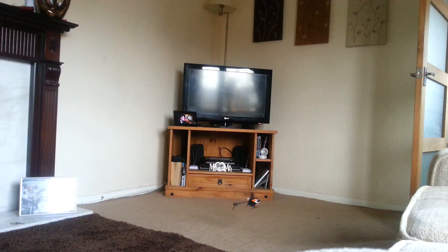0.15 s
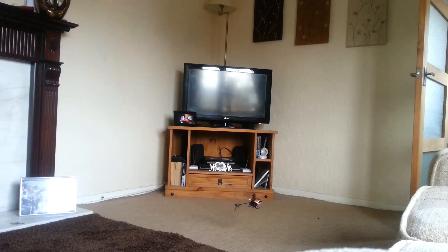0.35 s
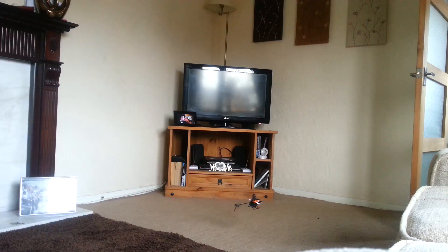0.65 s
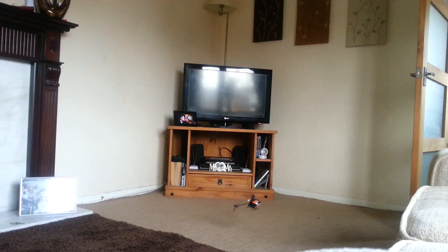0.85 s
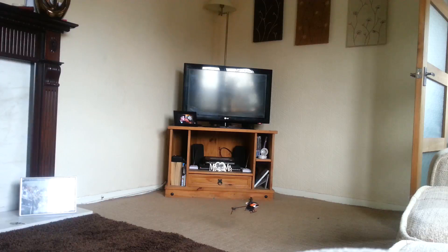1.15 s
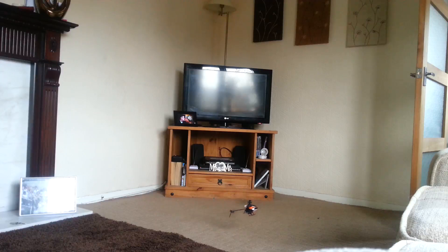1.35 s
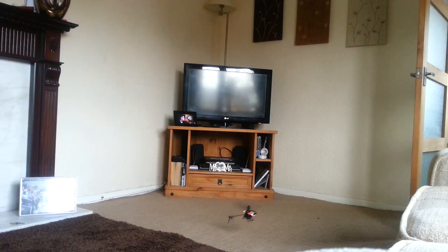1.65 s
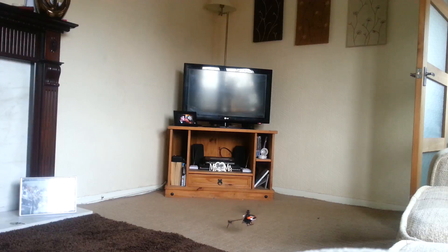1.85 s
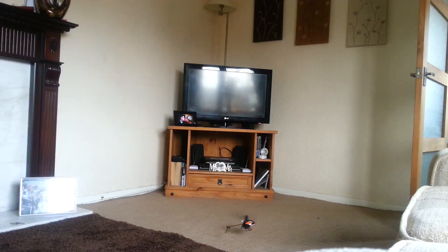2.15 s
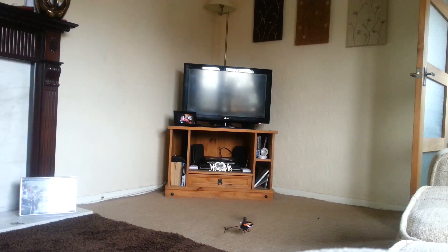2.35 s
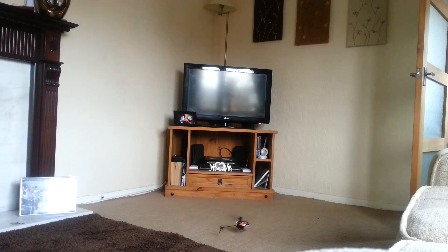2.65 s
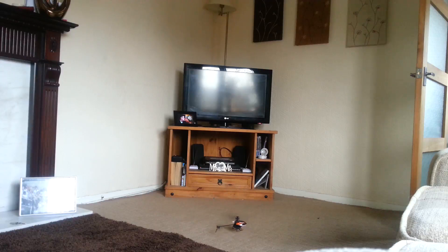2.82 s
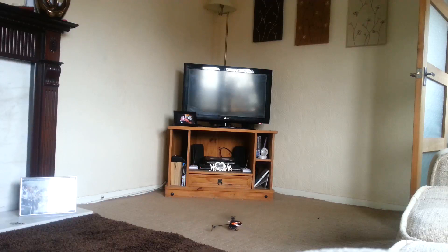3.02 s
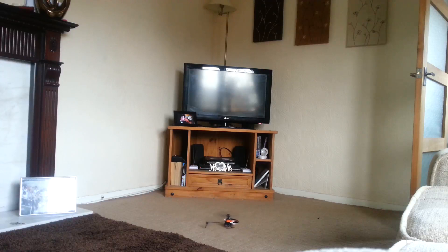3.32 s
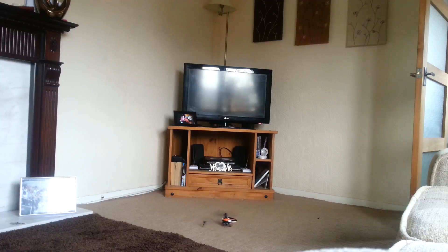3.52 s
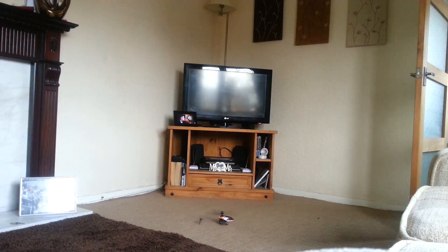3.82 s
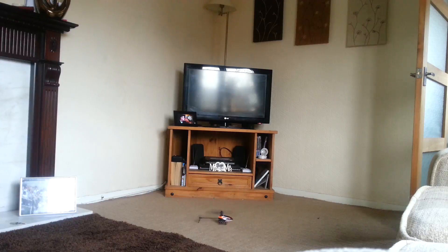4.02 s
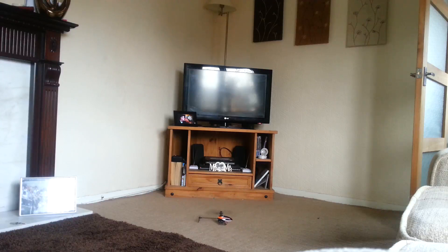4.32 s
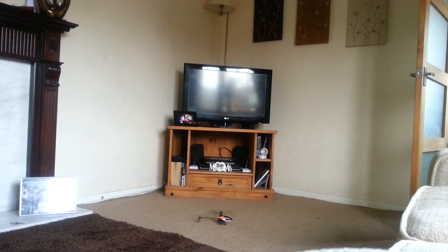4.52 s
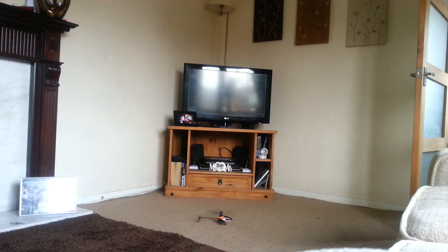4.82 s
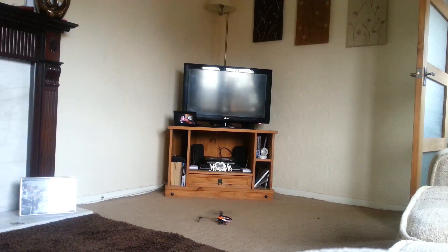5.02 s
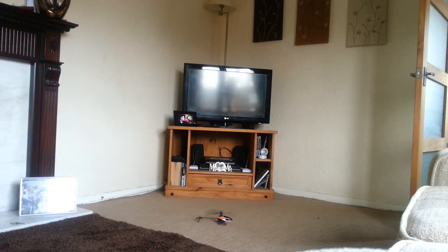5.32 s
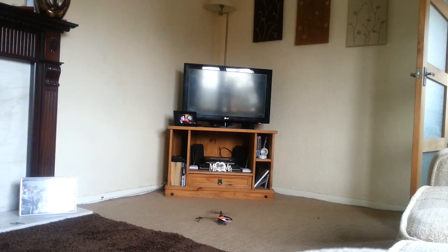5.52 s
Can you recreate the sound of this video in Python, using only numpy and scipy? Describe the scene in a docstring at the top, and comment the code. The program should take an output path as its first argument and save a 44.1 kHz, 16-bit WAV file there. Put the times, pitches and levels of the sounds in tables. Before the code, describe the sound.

In a carpeted living room, a toy electric helicopter hovers with a bright, buzzing motor whine, gear rattle and soft blade swish. The pitch sags slowly, then drops faster as it settles, with a wavering tail-propeller tone and soft skid bumps. At the end the motor cuts and loose gears knock and clatter as the rotor coasts. Fixed stereo microphone a little way off, faint hiss.

```python
"""A toy electric helicopter hovers low in a carpeted living room, over a faint hiss and low rumble.
A 7-tooth motor pinion drives the 54-tooth rotor gear: motor harmonics whine, tooth contacts rattle in the
plastic frame, two blades chop noise into a swish and a tail propeller adds a tone.
It sinks as the motor slows, its wake flutters on the carpet and the skids bump as decaying scuffs of noise.
The motor cuts, the whine dies and the slack gears clatter and knock as the rotor coasts."""
import sys
import numpy as np
from scipy import signal
from scipy.fft import rfft, irfft
from scipy.io import wavfile
from scipy.ndimage import uniform_filter1d

SR = 44100
rng = np.random.default_rng(int(sys.argv[2]) if len(sys.argv) > 2 else 0)


def master(y):
    """Save y as 16-bit WAV."""
    cut = np.clip(np.atleast_2d(y).T, -1, 1)
    pcm = np.round(cut * 32767)  # scale
    wavfile.write(sys.argv[1], SR, pcm.astype(np.int16))


N = 250047
TIME = np.arange(N) / SR
HZ = np.maximum(np.arange(N // 2 + 1) * SR / N, 1)

PINION_TEETH, GEAR_TEETH = 7, 54
ROTOR_PER_MOTOR = PINION_TEETH / GEAR_TEETH
MOTOR_CUT_S = 4.92
# main motor, hovering, throttled back, then coasting: (time [s], speed [turns/s])
SPEED = [(0.0, 276.7), (0.45, 276.4), (0.67, 273.4), (1.32, 272.7), (1.68, 269.7), (2.05, 269.35),
         (2.44, 267.5), (2.85, 259.9), (3.15, 256.3), (3.5, 250.4), (3.75, 240.4), (3.95, 227.3),
         (4.15, 209.4), (4.41, 179.8), (4.63, 165.6), (4.92, 157.9), (5.08, 118.0), (5.67, 48.0)]
# spectrum of air stirred by the blades: (frequency [Hz], relative density [dB])
WASH = [(30, -40), (90, -38), (160, -41), (215, -15.5), (280, -5), (335, -5), (420, 0.5), (620, 1.5),
        (770, -5), (950, -9), (1400, -10.5), (3000, -69)]


def from_db(db):
    """Decibels to amplitude gain."""
    return 10 ** (np.asarray(db) / 20)


def rms_one(x):
    """Scale to unit power."""
    return x / np.sqrt(np.mean(x ** 2) + 1e-20)


def in_time(rows):
    """Each column of a curve, interpolated at every sample."""
    s, *columns = np.transpose(rows)
    return [np.interp(TIME, s, c) for c in columns]


def over_hz(points):
    """A short spectrum interpolated over log frequency."""
    hz, value = np.transpose(points)
    return np.interp(np.log(HZ), np.log(hz), value)


def drift(rate_hz):
    """Smooth random wander of spread 1: noise through two poles at rate_hz."""
    step = 100  # samples
    pole = np.exp(-2 * step * np.pi * rate_hz / SR)
    noise = rng.standard_normal(N // step + 1002)
    slow = signal.lfilter([1], [1, -2 * pole, pole * pole], noise)[1000:]  # start-up dropped
    return np.interp(np.arange(N) / step, np.arange(len(slow)), rms_one(slow))


def swell(s, length_s):
    """A bell of height 1 around s, length_s wide at half its height."""
    return 2 ** -((2 * (TIME - s) / length_s) ** 2)


def surge(s, attack_s, release_s):
    """A straight rise to 1 at time s, then an exponential release."""
    rise = np.clip(1 + (TIME - s) / attack_s, 0, 1)
    return rise * np.exp(-np.maximum(TIME - s, 0) / release_s)


def filtered(x, order, hz, kind):
    """Butterworth filter."""
    return signal.sosfilt(signal.butter(order, hz, kind, fs=SR, output="sos"), x)


def panned(db):
    """Left and right gains of constant power, db apart."""
    gains = from_db(np.array([db, -db]).reshape(2, -1) / 2)
    return gains / np.sqrt(np.mean(gains ** 2, axis=0))


def room(x, colour, t60_s=0.18, direct=0.66):
    """A coloured source heard directly and through two diffuse tails that trade places as the craft moves."""
    # (frequency [Hz], left-right likeness [-1..1])
    likeness = [(60, 0.014), (250, 0.63), (500, 0.62), (1100, 0.27), (2000, 0), (4000, 0.31), (8000, 0.16),
                (13000, 0)]
    # (frequency [Hz], left-right balance [dB])
    balance = [(60, -2), (130, 4), (280, -0.5), (620, -6), (1350, 0), (2940, -2), (6410, -3), (14000, -1.5)]
    tails = rng.standard_normal((2, 2, N)) * from_db(-60 * TIME / t60_s) * (TIME > .002)
    tails = rfft(tails / np.sqrt(np.sum(tails ** 2, axis=2, keepdims=True)))
    place_rad = 2 * TIME
    mid, side = tails[0] * rfft(x * np.cos(place_rad)) + tails[1] * rfft(x * np.sin(place_rad))
    mid = (mid + direct * rfft(x)) / np.hypot(1, direct)
    alike = np.clip(over_hz(likeness), -.95, .95)
    ears = np.sqrt(1 + alike) * mid + np.sqrt(1 - alike) * side * [[1], [-1]]
    return irfft(ears * colour * panned(over_hz(balance)), N)


def tone(phase, pan_db, spread_rad, waver_db, wander_rad):
    """A unit-power partial whose level and phase waver at each ear as the reflections shift."""
    phase = phase + 2 * np.pi * rng.random()
    ears = []
    for sign in (1, -1):
        level = from_db(waver_db * drift(7.1))
        ears.append(level * np.cos(phase + sign * spread_rad / 2 + wander_rad * drift(3.25)))
    return rms_one(np.array(ears)) * panned(pan_db)


def motor_load():
    """Air drag takes power as the cube of the speed; 1 at full throttle."""
    speed = in_time(SPEED)[0]
    return (speed / speed.max()) ** 3


def slowing():
    """How many times the motor speed has halved since full throttle."""
    speed = in_time(SPEED)[0]
    return np.log2(speed.max() / speed)


def once_per_turn(rotor, share):
    """Noise of which a share comes back on every rotor turn, from the fixed flaws of gear and blades."""
    flaws = rng.standard_normal(1200)
    share = np.clip(share, 0, 1)
    repeated = flaws[(rotor % 1 * len(flaws)).astype(int)]
    return np.sqrt(share) * repeated + np.sqrt(1 - share) * rng.standard_normal(N)


def resonance_db(pitch_hz):
    """The lift that a tone gets while it glides through resonances."""
    # (centre [Hz], width [Hz], lift [dB])
    whine_peaks = [(555, 160, 13.5), (1267.3, 47, 13), (1926, 49, 4.5), (2225, 14, 12.5), (2714, 34, 5.5),
                   (4330, 110, 1.5), (4644, 13, 10.5), (4950, 120, 10)]
    return sum(db / (1 + (2 * (pitch_hz - hz) / width) ** 2) for hz, width, db in whine_peaks)


def frame_gain():
    """The plastic frame lifts whatever lies near its resonances."""
    # (centre [Hz], width [Hz], lift [dB])
    frame = [(1286, 72, 9.5), (1990, 200, 2), (2690, 15, 8.5), (4910, 184, 5.5), (5050, 23, 4)]
    return 1 + sum((from_db(db) - 1) / (1 + 2j * (HZ - hz) / width) for hz, width, db in frame)


def rattle_colour():
    """Spectrum of the gear rattle radiated by the frame."""
    # (frequency [Hz], relative density [dB])
    rattle = [(500, -24.5), (900, -7), (1150, -3.5), (1600, -1.5), (2100, 2.05), (2600, -3), (3000, -5.5),
              (3500, -3), (4500, -3), (4950, -6), (5500, -8.5), (8000, -10), (14000, -19)]
    return frame_gain() * from_db(over_hz(rattle))


def background(hiss_db=-57, rumble_db=-79, rumble_hz=120, lumpy_db=5.5):
    """Faint steady hiss and a lumpy low rumble."""
    hiss, rumble = rng.standard_normal((2, 2, N))
    rumble = filtered(rumble + rumble[::-1] / 3, 2, rumble_hz, "low")
    hiss = filtered(hiss, 1, 1500, "high")
    return from_db(hiss_db) * hiss + from_db(rumble_db) * rms_one(rumble * from_db(lumpy_db * drift(5.5)))


def downwash(low_hz=160, high_hz=350):
    """Close to the carpet the blades churn their own wake into a low flutter."""
    # (time [s], level before flutter [dB])
    wake = [(2.0, -72), (3.1, -71), (3.85, -62.5), (4.85, -61.5), (5.67, -67)]
    level_db, = in_time(wake)
    churn = filtered(rng.standard_normal((2, N)), 2, [low_hz, high_hz], "band")
    return from_db(level_db + 2 * drift(33)) * rms_one(churn + churn[::-1] / 2)


def hum(turns, level_db=-58.5, fall_db=35, rotor_multiple=8):
    """Motor unbalance and a blade harmonic lie close together and throb unevenly."""
    pair = 0
    for multiple in (1, rotor_multiple * ROTOR_PER_MOTOR):
        phase = 2 * np.pi * multiple * turns + 1.12 * drift(4.7)
        pair = pair + from_db(3.4 * drift(13)) * tone(phase, -2.2, -0.35, waver_db=1.5, wander_rad=0.25)
    return from_db(level_db - fall_db * slowing()) * rms_one(pair)  # fall per halving of speed


def blows(rows, colour, t60_s):
    """Each blow is a short scuff of noise that dies away in the room."""
    envelope = sum(from_db(db - 60 * np.maximum(TIME - s, 0) / t60_s) * (TIME >= s) for s, db in rows)
    colour = colour / np.sqrt(np.mean(abs(colour) ** 2))
    return room(envelope * rng.standard_normal(N), colour, t60_s=0.046, direct=1.0) / 2


def skid_bumps():
    """Skids touching the carpet: scuffs in the colour of the stirred air."""
    # (time [s], relative level [dB])
    bumps = [(3.339, -41), (3.875, -39.5), (4.382, -37), (5.036, -38.5), (5.295, -60)]
    return blows(bumps, from_db(over_hz(WASH)), t60_s=0.21)


def gear_knocks():
    """Slack gears knocking, radiated by the frame."""
    # (time [s], relative level [dB])
    knocks = [(4.575, -39), (4.933, -30), (4.985, -44), (5.02, -33), (5.495, -54)]
    return blows(knocks, rattle_colour(), t60_s=0.11)


def frame_buzz(hz=1288):
    """The frame's lowest resonance swells into brief buzzes: a rough, wavering tone."""
    # (middle [s], length [s], level [dB])
    buzzes = [(3.936, 0.031, -37), (4.004, 0.064, -39), (4.257, 0.055, -44), (4.9, .12, -58)]
    level = sum(from_db(db) * swell(s, length) for s, length, db in buzzes)
    phase = 2 * np.pi * hz * TIME + 1.0 * drift(34)
    return level * tone(phase, 0, 0.48, waver_db=6.0, wander_rad=0.37)


def tail_propeller(octave_db=-5, kick_rise_s=0.054, kick_fall_s=0.13):
    """Blade tone and its octave, slowing with the throttle and revving up to hold the heading."""
    # (time [s], blade rate before kicks [Hz], level before flutter [dB])
    tail = [(0, 505, -62.5), (1.9, 498, -61), (2.3, 488, -49.5), (2.6, 449.5, -51.5), (3.08, 420, -49),
            (3.25, 385.8, -56), (3.55, 346.4, -51.5), (3.85, 320.5, -50.5), (4.1, 273, -55.5),
            (4.2, 298, -58), (4.33, 297, -61.5), (4.6, 291, -67), (4.85, 295.7, -57.5), (5.15, 270, -77.5)]
    # brief revs: (time [s], rise [Hz])
    kicks = [(3.35, 54), (3.62, 54.8), (3.869, 116)]
    hz, db = in_time(tail)
    for s, rise_hz in kicks:
        hz = hz + rise_hz * surge(s, kick_rise_s, kick_fall_s)
    phase = 2 * np.pi * np.cumsum(hz * (1 + 0.00816 * drift(10.06))) / SR
    octave = tone(2 * phase, -8.5, 0.7, waver_db=3.0, wander_rad=0.79)
    octave = from_db(octave_db + resonance_db(2 * hz)) * octave
    flutter = from_db(4.4 * drift(32))  # the blades cut through the main rotor's wake
    return from_db(db) * flutter * (tone(phase, -0.62, -0.28, waver_db=4.5, wander_rad=0.14) + octave)


def blade_wash(turns, level_db=-45, fall_db=13.5, floor_db=-55, chop=0.35, regular=0.32):
    """Turbulence that swells as each of the two blades passes; the stirred air never falls below a floor."""
    rotor = turns * ROTOR_PER_MOTOR
    air = once_per_turn(rotor, regular * motor_load()) * (1 + chop * np.cos(4 * np.pi * rotor))
    air = room(air, from_db(over_hz(WASH)), t60_s=0.056, direct=1.21)
    air_db = np.maximum(level_db - fall_db * slowing(), floor_db)  # fall per halving of speed
    return from_db(air_db) * rms_one(air)


def tooth_contacts(turns, pulsing, throb, rough, regular):
    """Scraping contacts, hardest once per motor turn and swelling once per rotor turn; slack teeth rattle evenly."""
    rotor = turns * ROTOR_PER_MOTOR
    load = motor_load()
    pressure = pulsing * (np.cos(2 * np.pi * turns) + 0.75 * np.cos(4 * np.pi * turns))
    pressure += throb * np.cos(2 * np.pi * rotor)
    force = np.exp(load * pressure + rough * drift(150))
    force = force / np.sqrt(uniform_filter1d(force ** 2, size=8000))
    return once_per_turn(rotor, regular * load) * force


def dulled(x, above_hz=1540, fall_db=2):
    """Slower teeth strike more softly: the treble loses extra level per halving of speed."""
    low, high = (filtered(filtered(x, 2, above_hz, kind), 2, above_hz, kind) for kind in ("low", "high"))
    return low + high * from_db(-fall_db * slowing())


def slack_lift_db(lift_db=5.5, attack_s=0.053, release_s=0.41):
    """When the drive lets go the teeth fall slack and clatter louder for a while."""
    return lift_db * surge(MOTOR_CUT_S + attack_s, attack_s, release_s)


def gear_rattle(turns, level_db=-37, fall_db=3, coast_fade_db_per_s=3.5):
    """Tooth contacts radiated by the frame; the clatter thins out as the rotor runs down."""
    contacts = tooth_contacts(turns, pulsing=0.2, throb=0.49, rough=0.19, regular=0.13)
    rattle = dulled(rms_one(room(contacts, rattle_colour())))
    coast_db = coast_fade_db_per_s * np.maximum(TIME - MOTOR_CUT_S, 0)
    return from_db(level_db - fall_db * slowing() + slack_lift_db() - coast_db) * rattle


def gear_hiss(turns, level_db=-33, fall_db=11.5, slack_share=0.93):
    """Sharp edge of the tooth contacts, falling faster with speed than the rattle."""
    # (frequency [Hz], relative density [dB])
    edge = [(2000, -35), (3100, -2.5), (3800, 1), (4500, -2), (5100, 2), (5600, -4), (6100, -5.5),
            (7200, -0.5), (8300, -4.5), (9700, -7), (11200, -14), (12300, -9.5), (14500, -20)]
    contacts = tooth_contacts(turns, pulsing=0.48, throb=0.17, rough=0.14, regular=0.33)
    hiss = room(contacts, frame_gain() * from_db(over_hz(edge)), direct=0.25)
    return from_db(level_db - fall_db * slowing() + slack_share * slack_lift_db()) * rms_one(hiss)


def gear_beats(turns):
    """Single sidebands, whole rotor rates away from a harmonic, turn the whine into a fast steady buzz."""
    # (middle [s], motor multiple, offset [rotor rates], length [s], level [dB])
    beats = [(0.18, 7, -2, 0.68, -48), (0.14, 7, 1, 0.44, -49), (0.25, 8, -2, 0.61, -50),
             (0.75, 7, 1, 0.59, -48), (1.24, 7, 1, 0.41, -49), (1.0, 7, 2, 1.1, -50),
             (1.93, 7, -1, 0.42, -45), (1.8, 7, -2, 0.81, -50), (4.55, 7, 1, 0.39, -47),
             (0.87, 8, -1, 0.59, -46.5), (1.44, 8, -1, 1.3, -50), (1.05, 8, 1, 0.91, -51.5),
             (3.3, 8, -1, 0.45, -51), (1.9, 16, -2, 0.47, -49), (2.4, 16, 1, 0.7, -48)]
    out = np.zeros((2, N))
    for s, order, offset, length, db in beats:
        phase = 2 * np.pi * turns * (round(order) + round(offset) * ROTOR_PER_MOTOR)
        out += from_db(db) * swell(s, length) * tone(phase, -1, 0.98, waver_db=5.2, wander_rad=0.5)
    return out


def harmonic_db(order, full_db, fall_db, floor_db=-58, light_loss_db=11):
    """A harmonic weakens to a floor as the gears run light, and is lifted by resonances."""
    floor_db = min(full_db - light_loss_db, floor_db)
    return np.maximum(full_db - fall_db * slowing(), floor_db) + resonance_db(order * in_time(SPEED)[0])


def standing_waves(order):
    """Lift and lean [dB] of one harmonic as the craft drifts through the room's standing waves."""
    # (middle [s], motor multiple, length [s], lift [dB], left-right lean [dB])
    swells = [(2.16, 3, 1.25, 16, -2), (3.35, 3, 0.63, 13, -2), (4.5, 3, 0.19, 7.5, -2),
              (3.202, 5, 0.3, 15.5, 6), (3.64, 5, 0.11, 14, -6), (1.7, 6, 0.35, 8, 0), (3.4, 6, 0.14, 4, 0),
              (3.38, 6, 0.72, 13, -1), (4.11, 6, 0.099, 7, -2), (0.24, 7, 0.47, 5, -1.5),
              (1.03, 7, 0.45, -0.5, 12), (1.99, 7, 0.27, 6.5, -7), (2.92, 7, 0.25, 5.5, 3),
              (3.2, 7, 0.089, 1, -3), (3.74, 7, 0.37, 5.5, -5), (4.8, 7, 0.078, -3, 0),
              (3.5, 7, 0.14, -5, 0), (4.64, 7, 0.45, 12.5, 2), (0.27, 8, 0.45, 3.5, -1),
              (1.79, 8, 0.7, 9, 11), (2.9, 8, 0.46, -17, 4), (3.27, 8, 0.3, 4, -2), (3.66, 8, 0.076, 7, 0),
              (3.87, 8, 0.15, 12, 0), (4.54, 8, 0.3, 8, -2), (4.1, 9, 0.23, 21, 2), (4.59, 9, 0.2, 18, -2),
              (0.82, 10, 0.28, 5, 5), (1.44, 10, 0.11, -12, -2), (1.88, 10, 0.5, 6, -20),
              (4.19, 10, 0.13, 6, 0), (4.62, 10, 0.5, -20, -7), (0.24, 11, 0.42, 7, -8),
              (4.54, 12, 0.39, 15, 2), (3.2, 13, 1.6, 6, 2), (0.35, 14, .2, -3, -2),
              (1.05, 14, 0.7, 3.5, 0), (4.33, 14, 0.18, -3, 0), (1.96, 14, 0.16, 5, 3),
              (2.48, 14, 0.089, 8, -2), (4.65, 14, 0.41, 7.5, 12), (1.84, 15, 0.35, 13, -2),
              (2.3, 15, 0.25, 7, 0), (2.84, 15, 0.23, 8, 0), (0.35, 16, 0.29, 5.5, -17),
              (0.76, 16, 0.91, 2, -9), (1.54, 16, 0.13, -14, -2), (1.7, 16, .25, 6.5, 3),
              (2.41, 16, 0.22, 3.5, -7), (2.76, 16, 0.28, 5, 4), (3.23, 16, 0.29, -10, -4),
              (2.7, 17, 1.1, -11, 1), (1.92, 18, .25, -1, -2), (2.24, 18, 0.34, 12, -18),
              (0.55, 19, 0.11, 9, -2), (0.87, 19, .2, -4, 0), (1.35, 19, 0.7, 2.5, 0),
              (2.43, 19, 0.73, 7, 4), (0.2, 21, 0.76, -15, 0), (3.4, 21, 0.17, -1, -5),
              (3.7, 21, 0.14, 7, -2), (3.9, 21, 0.32, 1, -7)]
    out = np.zeros((2, N))
    for s, multiple, length, db, lean_db in swells:
        if round(multiple) == order:
            out += np.outer([db, lean_db], swell(s, length))
    return out


def motor_whine(turns, runout_slope=0.29, wobble=0.069, mesh_wobble=0.34, uneven=.08, chatter_db=4.5,
                shake_turns=0.003, overtone_db=2.5, overtone_fall_db=27, cut_fade_s=0.4):
    """Motor harmonics; under load the out-of-round rotor gear puts uneven sidebands on the tooth-mesh tones."""
    # strong: (motor multiple, full-speed level before lifts [dB], loss per halving of speed [dB],
    #          left-right level [dB], left-right phase at full load [rad])
    harmonics = [(3, -69.5, -3, -1, -1.3), (5, -61, 4.5, -9, -0.25), (6, -60.5, -0.5, 3, 1.2),
                 (7, -43.5, 13.5, -1.5, 2.15), (8, -50.5, 11, 1, -1.3), (9, -71, -2, -1, 2.1),
                 (10, -53, -4, 6, 1.57), (11, -54, 6, -2, 0.52), (12, -71, -2, 13, 2.4),
                 (13, -56, 19, 6, 1.3), (14, -47.5, 13, 3, 0.77), (15, -54, 23, -10, 0.63),
                 (16, -39, 49, -5, 1.3), (17, -47, 79, 1, -0.72), (18, -47, 79, -4, 0.81),
                 (19, -47.5, 11, -9, 1.9), (21, -47, 13, -1, 1.5)]
    # weak: (motor multiple, relative level [dB])
    overtones = [(22, -65), (24, -54.5), (25, -50.5), (26, -54), (27, -50.5), (30, -54), (32, -57)]
    rotor, load = turns * ROTOR_PER_MOTOR, motor_load()
    lightness = np.sqrt(1 - load)
    # the pinion shakes in its backlash as the load falls
    angle = 2 * np.pi * (turns + shake_turns * lightness * drift(22))
    out = np.zeros((2, N))
    for order, full_db, fall_db, pan_db, spread_rad in harmonics:
        order = round(order)
        runout = 0
        for k in range(1, 4):
            ripple = np.cos(2 * np.pi * (k * rotor + rng.random()))
            runout = runout + (1 + uneven * drift(25)) * ripple / k ** runout_slope
        depth = load * (mesh_wobble if order % PINION_TEETH == 0 else wobble)
        lift_db, lean_db = standing_waves(order)
        # lightly loaded teeth sing in rough bursts, less so where the room sustains them
        steadiness = from_db(np.maximum(lift_db, 0) / 2)
        lift_db = lift_db + chatter_db * lightness * (drift(16) - .5) / steadiness
        # a fixed path difference between the ears gives less phase at a lower pitch
        spread_rad = spread_rad * np.cbrt(load)
        partial = tone(order * angle, pan_db + lean_db, spread_rad, waver_db=0.9, wander_rad=0.35)
        out += from_db(harmonic_db(order, full_db, fall_db) + lift_db) * (1 + depth * runout) * partial
    throttle = from_db(overtone_db - overtone_fall_db * slowing())
    for k, (order, db) in enumerate(overtones):
        partial = tone(round(order) * angle, -0.61, 1.4 * (-1) ** k, waver_db=4.5, wander_rad=1.0)
        out += from_db(db) * throttle * partial
    # the teeth lose steady contact when the motor cuts
    return out * np.clip(1 - (TIME - MOTOR_CUT_S) / cut_fade_s, 0, 1) ** 2


def scene():
    """The motor's turning drives whine, rattle and blades together."""
    turns = np.cumsum(in_time(SPEED)[0]) / SR
    air = downwash() + tail_propeller() + blade_wash(turns)
    landing = skid_bumps() + gear_knocks() + frame_buzz()
    gears = gear_rattle(turns) + gear_hiss(turns) + gear_beats(turns)
    return background() + hum(turns) + air + landing + gears + motor_whine(turns)


def record(dry, cutoff_hz=14560):
    """The top is cut steeply by an elliptic low-pass."""
    return signal.sosfilt(signal.ellip(16, .1, 90, cutoff_hz, fs=SR, output="sos"), dry)


dry = scene()
out = record(dry)
master(out)
```